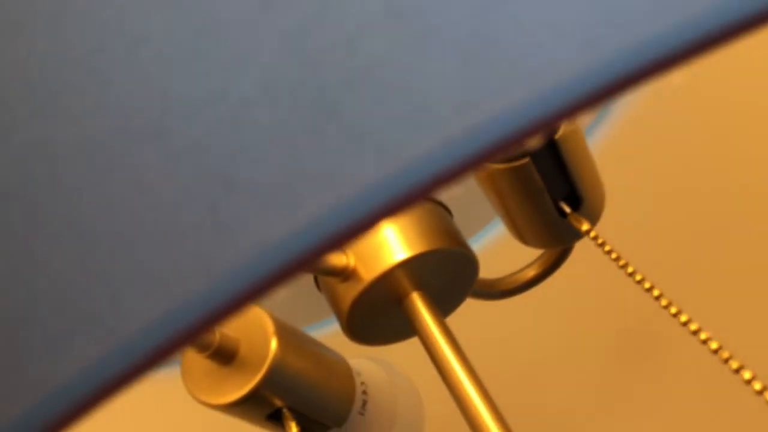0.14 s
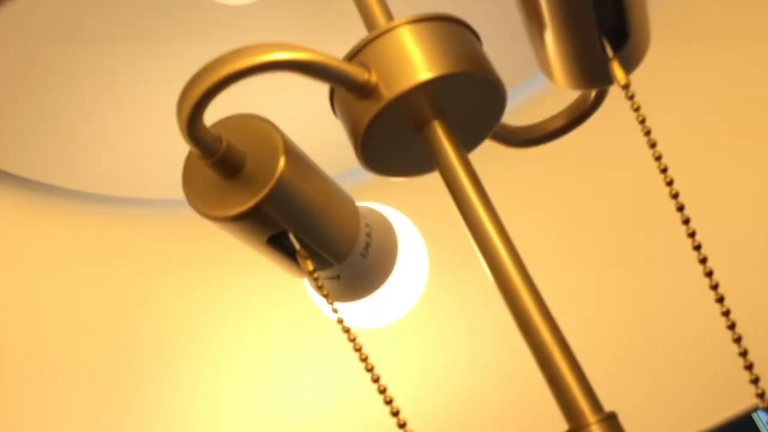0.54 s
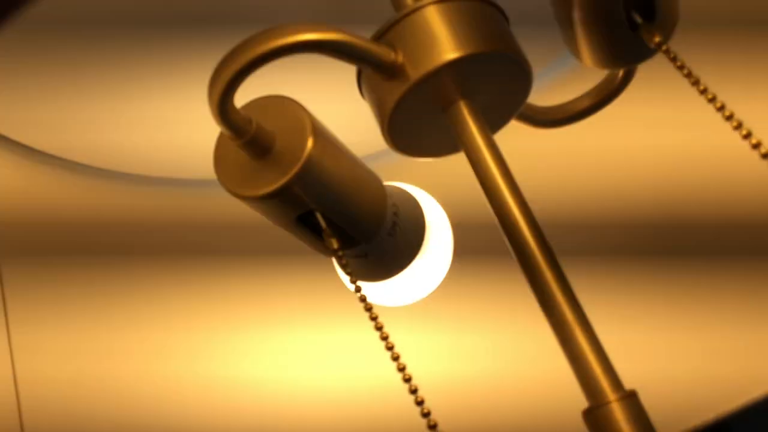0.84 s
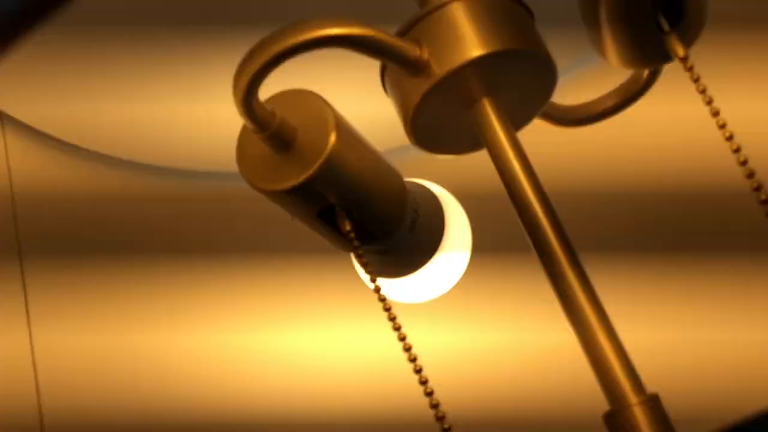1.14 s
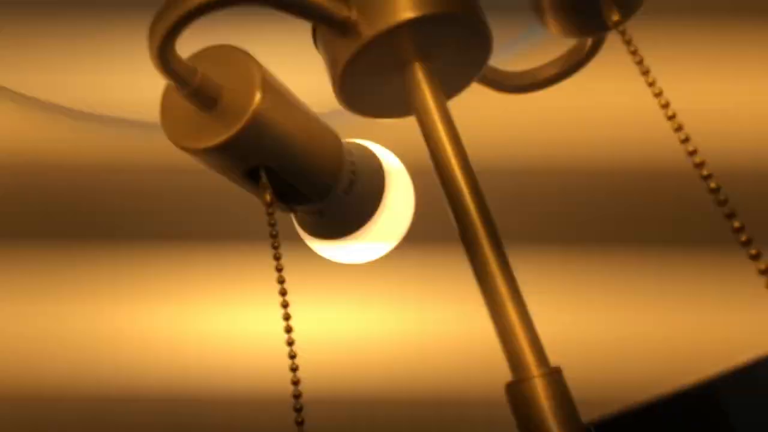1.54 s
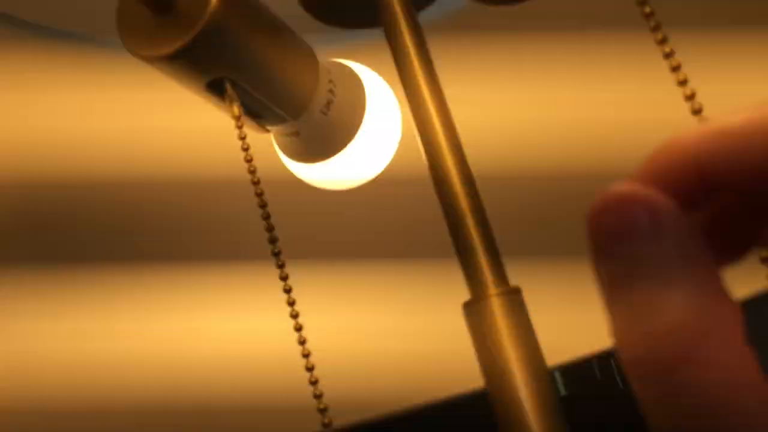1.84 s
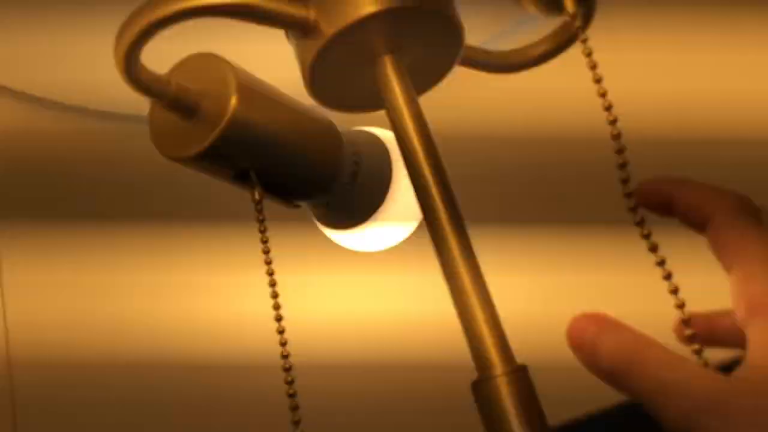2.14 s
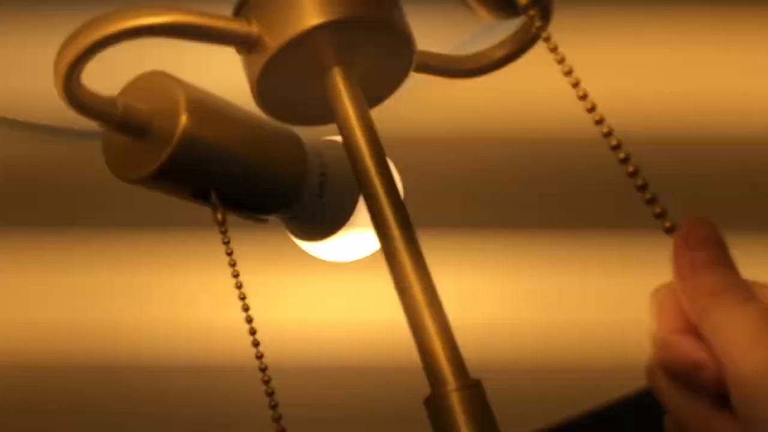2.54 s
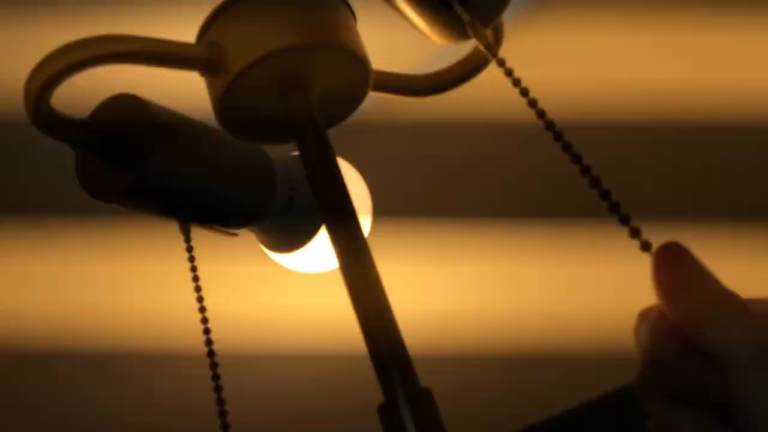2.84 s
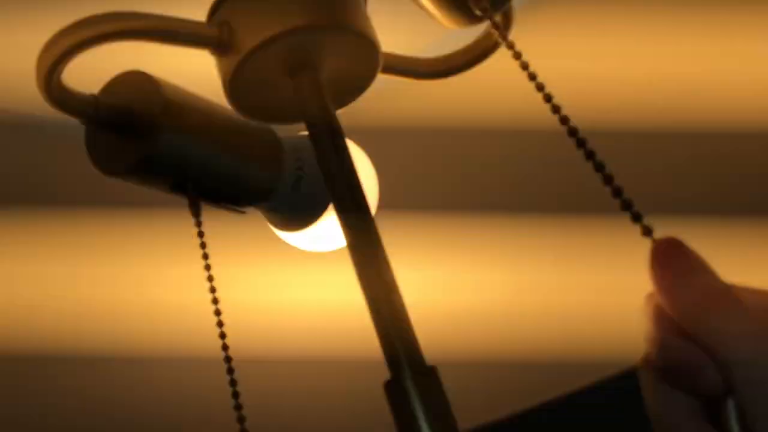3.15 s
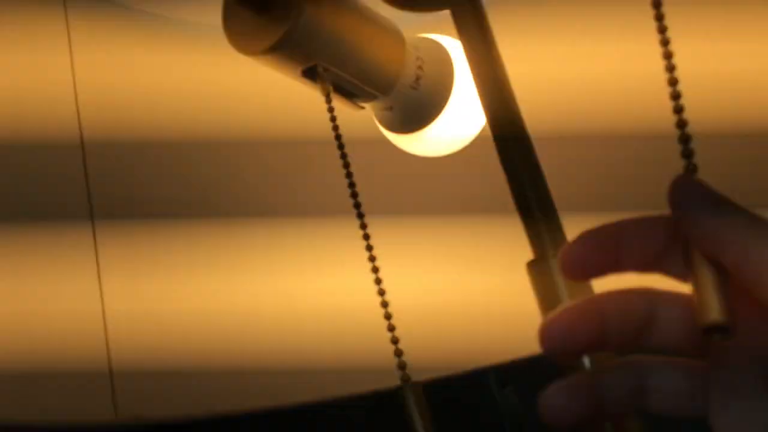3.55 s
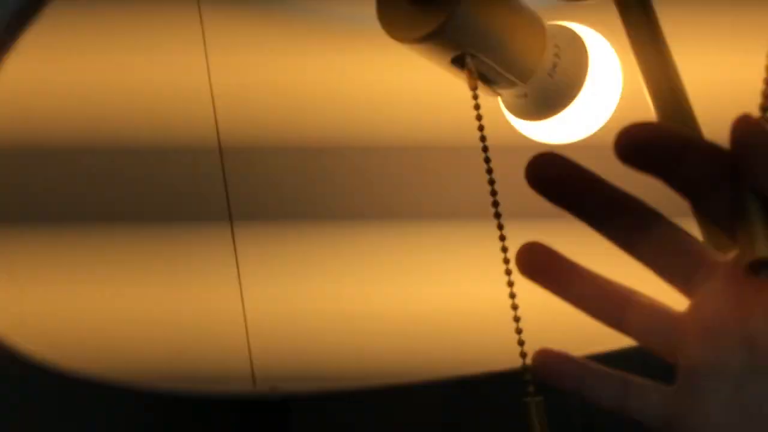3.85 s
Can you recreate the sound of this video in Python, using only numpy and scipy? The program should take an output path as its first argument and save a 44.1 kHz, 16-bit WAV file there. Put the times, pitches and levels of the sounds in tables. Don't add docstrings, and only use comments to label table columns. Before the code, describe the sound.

Pull-chain lamp switch snaps sharply three times, with bead ticks and short brassy ringing, close up indoors

```python
import sys
import numpy as np
from scipy import signal
from scipy.fft import rfft, irfft, next_fast_len
from scipy.io import wavfile
from scipy.ndimage import map_coordinates

SR = 44100
rng = np.random.default_rng(int(sys.argv[2]) if len(sys.argv) > 2 else 0)


def persist_wave(psi):
    counts = np.round(np.clip(psi, -1, 1) * 32767).astype(np.int16)
    wavfile.write(sys.argv[1], SR, np.atleast_2d(counts).T)


def how_loud(loudness_db):
    steps = np.asarray(loudness_db, float) / 20
    return 10 ** steps


N = 176400


def unit(x):
    return x / np.sqrt(np.mean(x ** 2) + 1e-20)


def along(points, hz):
    f, v = np.transpose(points)
    return np.interp(np.log(hz + 1), np.log(f + 1), v)


def filtered(x, response):
    m = next_fast_len(len(x) + 8192)
    return irfft(rfft(x, m) * response(np.fft.rfftfreq(m, 1 / SR)), m)[:len(x)]


def resonances(peaks):
    def response(f):
        total = 0
        for k, (hz, width_hz, db) in enumerate(peaks):
            damping = 1j * f * width_hz
            total = total + (-1) ** k * how_loud(db) * damping / (hz * hz - f * f + damping)
        return total
    return response


def add(track, s, x):
    part = track[max(round(s * SR), 0):][:len(x)]
    part += x[:len(part)]


def decay(db, t60_s, t):
    return how_loud(db - 60 * t / t60_s)


def noise_band(hz, width_hz):
    return unit(filtered(rng.standard_normal(N), lambda f: np.exp(-((f - hz) / width_hz) ** 2)))


def air():
    # f/Hz, density/dB
    rumble = [(12, -65), (20, -49), (41, -6), (64, 1), (129, -6), (195, -5.5), (218, -10), (252, -9.5),
              (900, -31.5), (1170, -65), (1980, -120)]
    hiss = [(410, -33.5), (700, -2.5), (842, -18.5), (1030, -7.5), (1890, -12), (6040, -16.5), (9600, -17),
            (15200, -25.5), (16500, -36.5)]
    # f/Hz, width/Hz, level/dB, from t/s
    steady = [(67.6, 10, -59.5, 0.06), (157, 12.8, -65, 0.31), (191, 3.5, -72.5, 0.025),
              (250.4, 6.9, -69.5, 0.0047), (516, 97, -71.5, 0), (1038, 100, -81.5, 0),
              (1700, 12, -98.5, 0.16), (4970, 250, -90, 0.36), (7580, 150, -89.5, 0),
              (9610, 120, -89.5, 0.45), (11400, 120, -97, 0), (13500, 320, -99, 0)]
    # f/Hz, width/Hz, level/dB, from t/s, to t/s
    passing = [
        (191, 3.6, -64.5, 1.43, 3.1),
        (248.3, 9.2, -59, 0.496, 0.94),
        (66.7, 6, -49, 0.011, 0.2),
        (14400, 38, -89, 0.26, 0.47),
    ]
    rumble_db, hiss_db, swell_db = -54.5, -74.5, 1.0
    whine_from_hz, flicker_db, flickers_per_s = 9000, 2.5, 45

    def colour(points):
        return unit(filtered(rng.standard_normal(N), lambda f: how_loud(along(points, f))))

    t = np.arange(N) / SR
    swell = how_loud(swell_db * map_coordinates(rng.standard_normal(16), [t * 3]))
    x = how_loud(rumble_db) * swell * colour(rumble) + how_loud(hiss_db) * colour(hiss)
    for hz, width_hz, db, start_s in steady:
        flicker = map_coordinates(rng.standard_normal(200), [t * flickers_per_s])
        level_db = db + flicker_db * (hz > whine_from_hz) * flicker
        x += how_loud(level_db) * noise_band(hz, width_hz) * (t >= start_s)
    for hz, width_hz, db, start_s, end_s in passing:
        u = np.clip((t - start_s) / (end_s - start_s), 0, 1)
        x += how_loud(db) * noise_band(hz, width_hz) * np.sqrt(np.sin(np.pi * u) + 1e-12)
    return x


def room(x):
    # f/Hz, t60/s
    t60_s = [(1200, 0.2), (2000, .3), (2800, 0.5), (4200, 0.42), (5000, 0.68), (5900, 0.48), (9000, 0.45),
             (16000, .24)]
    # f/Hz, level/dB
    wall_db = [(800, 1), (1800, -1), (2700, 4.5), (3500, 0.5), (5000, -3.5), (6500, -3), (9000, -9.5),
               (16000, -4)]
    hz, t, z = signal.stft(rng.standard_normal(SR // 2), SR, nperseg=256)
    level_db = along(wall_db, hz)[:, None] - 60 * t / along(t60_s, hz)[:, None]
    tail = signal.istft(z * how_loud(level_db), SR, nperseg=256)[1]
    delayed = np.pad(x, (250, 0))
    return signal.fftconvolve(delayed, tail / np.linalg.norm(tail))[:len(x)]


def contact(rough=.15, tail_s=.0003):
    count = 4096
    t = np.arange(count) / SR
    return (t == 0) + rough * rng.standard_normal(count) * np.exp(-t / tail_s)


def bead_ticks():
    # t/s, level/dB, ring f/Hz, ring t60/s, ring over tick/dB
    ticks = [(.0047, -72, 9200, .006, 16), (.0047, -62, 14500, .004, 0), (.3553, -66, 5100, .012, 12),
             (.3585, -68, 4700, .015, 13), (.3565, -70, 2950, .015, 15), (.3555, -72, 2100, .012, 13),
             (.3572, -68, 8700, .008, 8), (.4072, -76, 2860, .018, 14), (.4175, -70, 6700, .012, 11),
             (.4205, -74, 4910, .02, 13), (1.2432, -53, 13300, .004, -8), (1.3128, -46.5, 10800, .04, -12),
             (1.4152, -47.5, 5500, .02, -15), (2.7677, -76, 13300, .008, 15),
             (2.7738, -50, 4050, .015, -10), (2.7765, -58, 11500, .005, -6)]
    from_hz = 5000
    x = np.zeros(N)
    for s, db, hz, t60_s, ring_db in ticks:
        hit = filtered(contact(rough=.4, tail_s=.0022), lambda f: (1j * f / (from_hz + 1j * f)) ** 3)
        t = np.arange(len(hit)) / SR
        ring = decay(ring_db, t60_s, t) * np.sin(2 * np.pi * hz * t)
        add(x, s, how_loud(db) * (hit / abs(hit).max() + ring))
    return x


def chain_scrapes():
    # t/s, length/s, level/dB, stressed f/Hz, stress/dB
    drags = [
        (0.342, 0.038, -63.5, 3130, 12),
        (0.351, 0.017, -66, 4900, 12),
        (0.402, 0.019, -65.5, 2830, 14),
        (0.413, 0.028, -68, 4950, 3),
        (0.418, 0.013, -71, 3400, 3),
        (0.471, 0.031, -71.5, 3570, 17),
        (0.46, .032, -75, 5000, 13.5),
        (2.6, 0.048, -73, 5200, 3),
        (2.742, 0.077, -60, 4030, 11),
    ]
    # f/Hz, width/Hz, level/dB
    mouth = [(2000, 500, -7), (2850, 400, -3), (3550, 350, -1), (5000, 900, 0), (6800, 900, -4),
             (8800, 1200, -5), (10600, 1200, -6)]
    grains_per_s, stress_q = 5000, 14
    x = np.zeros(N)
    for s, length_s, db, hz, stress_db in drags:
        u = np.arange(4410) / SR / length_s
        grains = rng.standard_normal(len(u)) * (0.13 + (rng.random(len(u)) < grains_per_s / SR))
        drag = unit(grains) * np.sin(np.pi * np.minimum(u, 1))
        stress = resonances([(hz, hz / stress_q, stress_db)])
        add(x, s, how_loud(db) * filtered(drag, lambda f: resonances(mouth)(f) * (2 + stress(f))))
    return x


def beads():
    x = bead_ticks() + chain_scrapes()
    return x + how_loud(-11.5) * room(x)


def chatter(contacts, strike):
    stress_q = 4
    x = np.zeros(N)
    for s, db, hz, stress_db in contacts:
        stress = resonances([(hz, hz / stress_q, stress_db)])
        hit = filtered(contact(), lambda f: strike(f) * (1 + stress(f)))
        add(x, s, how_loud(db) * hit / abs(hit).max())
    return x


def rattle(strike, db, t60_s):
    dull_hz, rise_s = 6260, 0.0019
    t = np.arange(SR) / SR
    noise = unit(filtered(rng.standard_normal(SR), lambda f: strike(f) / (1 + 1j * f / dull_hz) ** 2))
    return decay(db, t60_s, t) * (1 - np.exp(-t / rise_s)) * noise


def spring_creak(t, db, growth_s):
    # f/Hz, width/Hz, level/dB
    spring = [(3686, 670, -6), (5100, 200, -0.5), (8070, 200, -4.5), (10000, 900, -19.5)]
    noise = unit(filtered(rng.standard_normal(len(t)), resonances(spring)))
    return how_loud(db) * np.exp(t / growth_s) * noise


def stem_knock(db):
    # f/Hz, level/dB, t60/s
    stem = [(476.4, -1.5, 0.17), (738, -3, 0.081), (1188, 4, 0.058)]
    t = np.arange(SR) / SR
    tones = sum(decay(mode_db, t60_s, t) * np.sin(2 * np.pi * hz * t) for hz, mode_db, t60_s in stem)
    return how_loud(db) * tones * (1 - np.exp(-t / 0.0051))


def shell_ring(shell, db):
    t = np.arange(SR) / SR
    tones = 0
    for hz, mode_db, t60_s in shell:
        tones = tones + decay(mode_db, t60_s, t) * np.sin(2 * np.pi * (hz * t + rng.random()))
    return how_loud(db) * tones * (1 - np.exp(-t / 0.002))


def snap(contacts, body, shell, knock_db, ring_db, rattle_db, rattle_s, lead_db, lead_s, room_db):
    start_s, strike = contacts[0][0], resonances(body)
    x = chatter(contacts, strike)
    add(x, start_s, rattle(strike, rattle_db, rattle_s))
    lead = np.arange(-1300, 0) / SR
    add(x, start_s + lead[0], spring_creak(lead, lead_db, lead_s))
    whole = np.zeros(N)
    add(whole, start_s, filtered(contact(), strike))
    x += how_loud(room_db) * room(whole * np.linalg.norm(x) / np.linalg.norm(whole))
    add(x, start_s + .002, stem_knock(knock_db))
    add(x, start_s, shell_ring(shell, ring_db))
    return x


def switch():
    # t/s, level/dB, stressed f/Hz, stress/dB
    release_near = [(1.1073, -27, 6000, 4), (1.108, -26, 10400, 12), (1.109, -29, 5000, 6),
                    (1.111, -24, 5000, 12), (1.1142, -33, 5200, 8), (1.1162, -32, 10000, 8),
                    (1.1202, -38, 8900, 14)]
    pull_far = [(2.8031, -17, 12800, 14), (2.804, -18, 5200, 8), (2.805, -21, 11400, 8),
                (2.8066, -23, 9400, 8), (2.8088, -30, 5200, 8), (2.811, -30, 9500, 4),
                (2.8136, -28, 5100, 14)]
    release_far = [(3.0594, -15, 12850, 18), (3.0597, -11.5, 9200, 18), (3.0604, -12, 8400, 16),
                   (3.0613, -12.5, 5400, 14), (3.0621, -17, 6500, 10), (3.063, -17.5, 5400, 10),
                   (3.0643, -19, 3150, 12), (3.0656, -21, 9100, 14), (3.0675, -24, 4200, 8),
                   (3.0692, -24, 5600, 10)]
    # f/Hz, width/Hz, level/dB
    body_1 = [(1334, 260, -17.5), (1680, 100, -13), (2340, 220, -13), (2800, 230, -14.5), (3460, 230, -10),
              (4240, 750, -12.5), (4840, 280, -2), (5420, 180, -5), (7000, 800, -9.5), (8900, 320, -6),
              (10470, 480, -8), (11500, 460, -14), (12600, 830, -17), (15400, 500, -20)]
    body_2 = [(1743, 450, -14), (2523, 550, -17.5), (3600, 300, -7.5), (4840, 240, -3.5), (5170, 450, -4.5),
              (5570, 160, -3.5), (6390, 500, -10.5), (7870, 820, -12), (9230, 400, -3.5),
              (10000, 540, -5.5), (11300, 340, -3), (12600, 400, -4.5), (13200, 650, -7.5),
              (15840, 250, -10.5)]
    body_3 = [(1480, 150, -7), (3194, 500, -8), (4110, 250, -4), (4660, 180, 0.5), (5570, 350, 0.5),
              (5896, 170, -1), (6500, 190, 0), (7230, 400, -6), (8370, 620, -1.5), (9340, 190, 1.5),
              (10130, 350, -8.5), (11700, 385, -11.5), (12850, 1100, -9.5), (14800, 2000, -22.5)]
    near_hz = [1676, 3386, 3560, 4904, 5593, 6562, 7515, 8710, 9846, 10970]
    far_hz = [1513, 1674, 3529, 4081, 4985, 5060, 5545, 5819, 6293, 7311, 7537, 8145, 9130, 10015]
    # level/dB, t60/s
    shell_near = [(-29, 2.2), (-23, 0.61), (-20, 0.25), (-27, 0.25), (-19, 0.9), (-3, 0.19), (-17, 0.5),
                  (-14, 0.33), (-19, 0.34), (-34, 0.33)]
    shell_far = [(-29.5, 0.8), (-20.5, 0.2), (-11, 0.14), (-28.5, .22), (-18.5, .14), (-29.5, .6),
                 (-30, .41), (-33.5, .5), (-12, 0.34), (-29, 0.2), (-24, 0.23), (-29, .35), (-32, .14),
                 (-25.5, 0.13)]
    knocks_db = [
        -54.5,
        -55.5,
        -45.5,
    ]
    # shell ring/dB, rattle/dB, rattle t60/s, spring creak/dB, its growth/s, room/dB
    levels = [
        (-47.5, -31.5, 0.048, -55, 0.0055, -19.5),
        (-37, -28, 0.051, -51, 0.003, -22),
        (-27, -23, 0.051, -45.5, 0.007, -22.5),
    ]
    pull_low_db, pull_high_db = -2, 7.5

    near, far = np.c_[near_hz, shell_near], np.c_[far_hz, shell_far]
    pulled = far.copy()
    pulled[far[:, 0] < 1600, 1] += pull_low_db
    pulled[far[:, 0] > 8000, 1] += pull_high_db
    return (snap(release_near, body_1, near, knocks_db[0], *levels[0])
            + snap(pull_far, body_2, pulled, knocks_db[1], *levels[1])
            + snap(release_far, body_3, far, knocks_db[2], *levels[2]))


def scene():
    return (air() + beads() + switch())[None]


def low_pass(x):
    return signal.sosfilt(signal.butter(12, 16860, fs=SR, output="sos"), x)


def record(dry):
    low_hz, top_hz, above_db = 36, 16000, -16

    def band(f):
        shelf_db = above_db / (1 + np.exp(np.clip((top_hz - f) / 70, -50, 50)))
        slope_db = np.maximum(f - 16600, 0) / 12
        return how_loud(shelf_db - slope_db) / np.sqrt(1 + (low_hz / (f + 1)) ** 6)

    return low_pass(filtered(dry[0], band)[None])


dry = scene()
out = record(dry)
persist_wave(out)
```